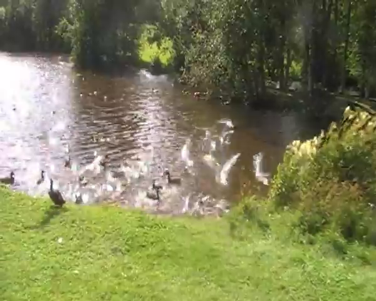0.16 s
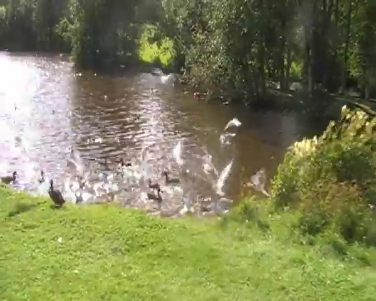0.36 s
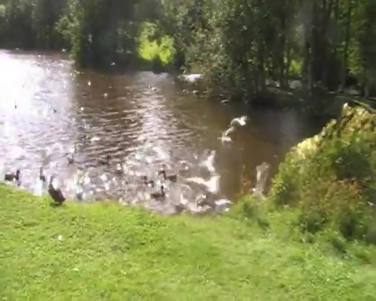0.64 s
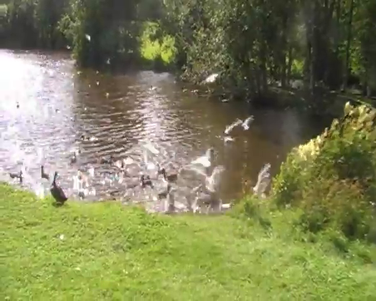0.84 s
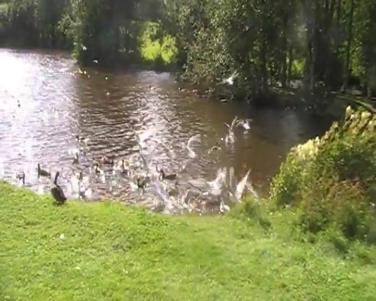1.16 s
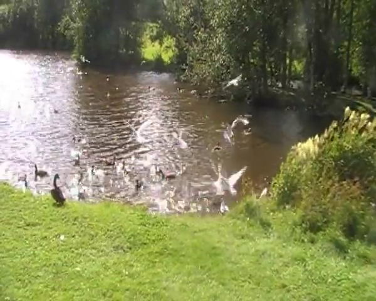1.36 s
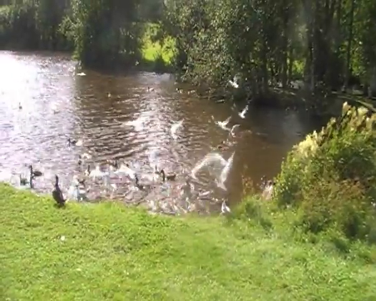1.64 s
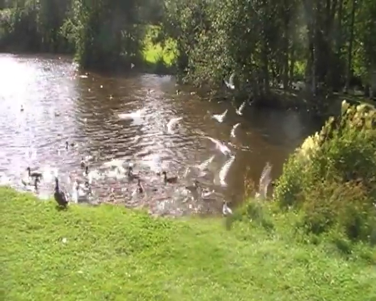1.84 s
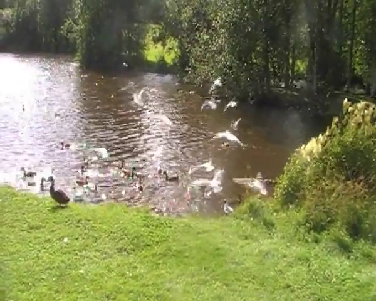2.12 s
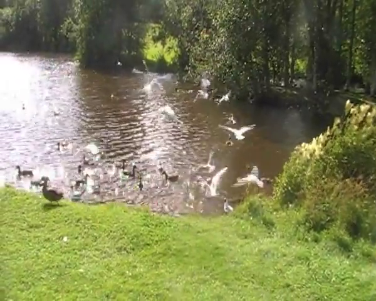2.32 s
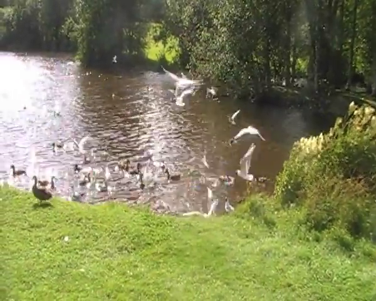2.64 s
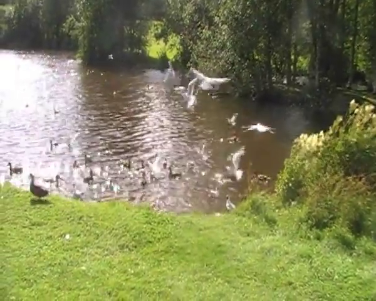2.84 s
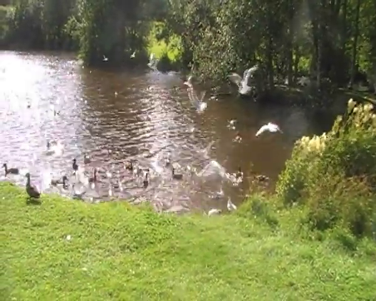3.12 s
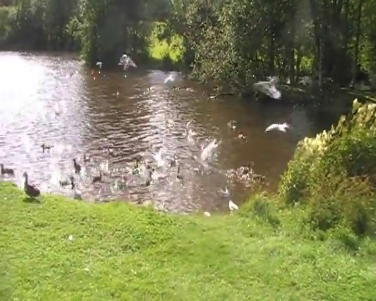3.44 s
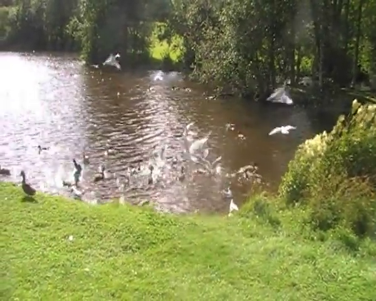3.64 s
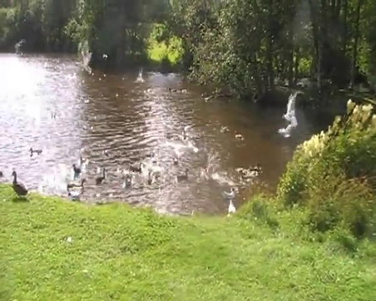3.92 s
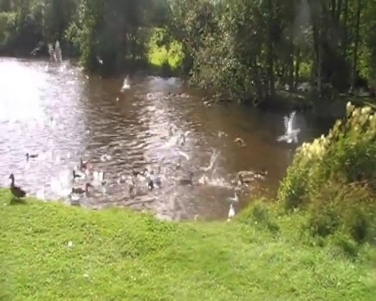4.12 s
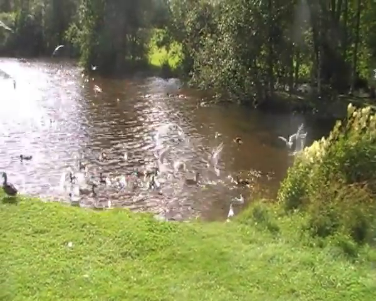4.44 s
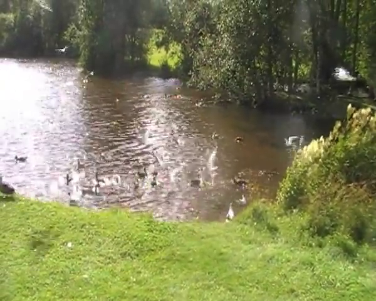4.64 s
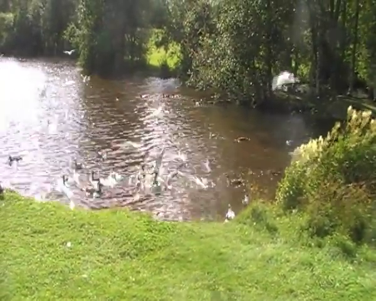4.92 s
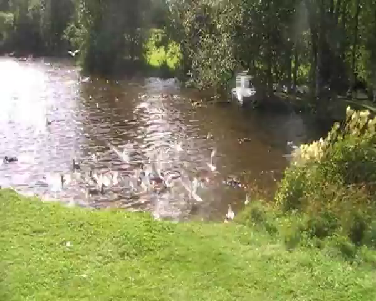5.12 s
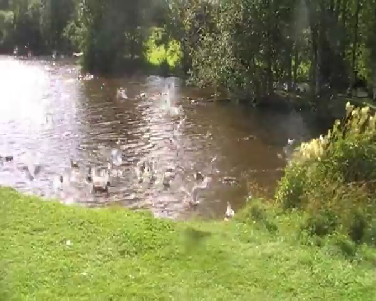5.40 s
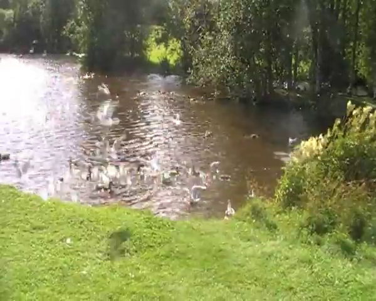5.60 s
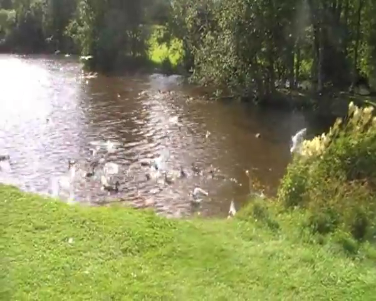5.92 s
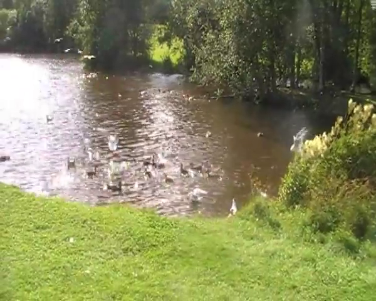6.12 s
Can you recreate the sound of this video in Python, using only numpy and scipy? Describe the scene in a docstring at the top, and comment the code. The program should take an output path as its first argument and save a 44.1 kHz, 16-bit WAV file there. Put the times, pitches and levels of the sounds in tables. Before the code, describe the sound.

Outdoor stereo sound of gulls over water, starting quiet with soft hiss while the water noise swells in. Hoarse rasps come about once a second, mostly leaning slightly right, with small croaks, a nasal grunt and faint far peeps. After the last rasp comes a bright, piercing kek with an open-air echo, then bright splashes and a brief trilled whistle arching high and falling. Paddling bubbles and low far rumble continue underneath.

```python
"""A grassy riverbank, gulls squabbling over food: long rasping cries, two sharp keks, a whistle that rises and falls.
The cries are rough syrinx pulses rung by throat and beak; keks, whistle and small notes are summed overtones.
Birds splash and paddle in shaped noise and rising bubble rings, and a low noise rumble hangs in the distance.
Bank and trees across the water answer the calls with decaying noise; the microphone adds a steady hiss."""
import sys
import numpy as np
from scipy import signal
from scipy.fft import rfft, irfft, next_fast_len
from scipy.io import wavfile
from scipy.ndimage import uniform_filter1d, map_coordinates

SR = 44100
rng = np.random.default_rng(int(sys.argv[2]) if len(sys.argv) > 2 else 0)


def waveform_to_disk(signal):
    """Save audio, clipped to [-1, 1], as 16-bit WAV at the path in sys.argv[1]."""
    frames = np.transpose(np.atleast_2d(signal))
    scaled = np.clip(frames, -1, 1) * 32767
    samples = np.round(scaled).astype(np.int16)
    wavfile.write(sys.argv[1], SR, samples)


N = 276066
TIME = np.arange(N) / SR

# Rasping cries before their pushes of effort:
# start_s, length_s, attack_s, level_db, pulse_hz, roughness_0_to_1, beak_hz, left_over_right_db
RASPS = [(0.554, .495, 0.095, -53.5, 409.3, 0.73, 1700, -2.5),
         (1.573, .5, 0.056, -47, 419.5, 0.77, 1726, -2.5), (2.98, .34, 0.024, -55, 487.2, 0.57, 1411, -3.5),
         (3.655, 0.4067, 0.034, -47, 450.5, .55, 1468, -6),
         (4.481, 0.31, 0.011, -55, 457.5, 0.7, 1406, -6.5)]
# Throat response, one list per cry: frequency_hz, gain_db
THROATS = [
    [(240, -36), (400, -25), (437, -14.5), (686, -11), (859, -1.5), (1040, -2), (1190, -1), (1820, -6.5),
     (2230, 0), (3120, -11), (3290, -8.5), (4120, -16), (4970, -10), (6230, -24), (8000, -28), (10400, -74),
     (17600, -120)],
    [(240, -51), (400, -25), (686, -34), (828, -7), (1060, -15.5), (1220, -9.5), (1800, -4.5),
     (2490, -11.5), (2740, -10.5), (3330, -27.5), (3590, -13.5), (4220, -23), (4670, -13), (5850, -31),
     (8000, -33), (10400, -41), (17600, -120)],
    [(350, -27), (600, 2), (735, -27), (899, -9), (1060, -13), (1160, -2.5), (1310, -2), (1450, 1),
     (2020, -16.5), (2330, 3), (3000, -18), (3270, -5), (3710, -34), (4500, -26), (5850, -53), (9900, -120)],
    [(240, -68), (400, -16), (583, -12), (723, -14), (784, -5.5), (897, -5.5), (986, -12.5), (1070, -2),
     (1210, -11.5), (1480, -4.5), (2010, -6), (2150, -8), (3270, -16), (4700, -17.5), (10000, -35),
     (13000, -60), (22000, -120)],
    [(410, -31), (700, -17), (903, -8.5), (1140, -18.5), (1400, 1.5), (1740, -12.5), (1940, -9),
     (2550, -11.5), (2790, -21), (3210, -11.5), (5000, -23), (6500, -47), (11000, -120)],
]
# Pushes and lulls of effort within the cries; pulse_hz is the target before effort raises it:
# peak_s, half_length_s, added_db, pulse_hz, roughness_0_to_1, beak_hz
PUSHES = [(0.685, 0.033, 3, 403, 0.67, 1750), (0.836, 0.025, 2.5, 406.8, 0.78, 1890),
          (.945, .026, 4.5, 390.6, 0.38, 2060), (1.014, .025, -1.5, 410.1, .64, 1450),
          (1.67, 0.011, 2.5, 418.5, 0.79, 1729), (1.863, .06, 1.5, 421.3, .74, 1960),
          (2.017, .025, 8.5, 422, .05, 2280), (3.03, .027, 5.5, 374.8, 0.48, 1380),
          (3.157, .02, -3, 486.6, 0.54, 1450), (3.205, 0.016, 5.5, 465, 0.52, 1660),
          (3.255, .018, 6, 456, .45, 1642), (3.752, .048, 6, 296, .2, 1970),
          (3.995, 0.024, 9, 410.6, 0.36, 2164), (4.502, .012, 4, 447.7, 0.61, 1393),
          (4.634, 0.024, -3.5, 453.7, 0.74, 1424), (4.731, 0.025, 6, 434.5, 0.74, 1906)]
# Single croaks around the cries, levels relative to each other: start_s, level_db, length_s
CROAKS = [(.531, -56, 0.012), (.568, -59, 0.013), (.61, -56, 0.011), (1.544, -45.5, 0.016),
          (1.576, -52.5, 0.011), (1.6, -49, 0.0079), (1.629, -71, .012), (1.658, -65, 0.012),
          (3.553, -46.5, 0.031), (3.585, -42, 0.036), (3.627, -50, 0.024), (3.683, -52, .012),
          (4.52, -47, 0.011), (4.568, -53, 0.0089), (4.84, -49.5, 0.036)]
# Strained tones breaking through the cries, levels relative to each other:
# start_s, length_s, middle_pitch_hz, glide_hz_per_s, level_db, roughness_0_to_1
STRAINS = [(.532, 0.052, 840, -600, -59.5, 0.2), (.635, 0.073, 860, -1200, -51, 0.28),
           (.72, 0.12, 818, -300, -60, 0.07), (1.585, 0.46, 846.4, -62, -55.5, 0.27),
           (3.71, 0.23, 877, -3, -53, 0.28), (3.012, 0.066, 1184, 302, -46.5, 0.16),
           (3.07, 0.034, 1501, 3, -50, 0.21), (3.138, 0.053, 1484, 0, -54, 0.09),
           (3.228, 0.049, 1440, -1100, -46.5, 0.33), (3.672, 0.033, 1371, 6000, -42, 0.31),
           (3.712, 0.055, 1522, -600, -40, 0.18), (3.785, .037, 1454, -300, -38.5, 0.22),
           (3.85, 0.067, 1346, -400, -42.5, 0.22)]
# Overtones of a strained tone: multiple, level_db
STRAIN_TONE = [(1, 8.5), (2, -7), (3, -8)]
# Keks, timed where the screech snaps clear: snap_s, pitch_hz, level_db, clear_note_length_s, glide_hz_per_s
KEKS = [(.718, 1673, -47.5, 0.052, 467), (4.945, 1672, -36.5, 0.042, 122)]
# Overtones of a kek: multiple, level_db
KEK_TONE = [(1, 1.5), (2, 6.5), (3, -4), (4, -3), (5, -19), (6, -18.5), (9, -34)]
# Course of the whistle before its trill, levels relative to each other: time_s, pitch_hz, level_db
WHISTLE_COURSE = [(5.728, 1530, -59), (5.746, 1688, -67), (5.764, 2082, -48), (5.804, 2684, -40.5),
                  (5.868, 3197, -45), (5.888, 3190, -39.5), (5.912, 2910, -50), (5.918, 2800, -35),
                  (5.926, 2144, -44), (5.94, 2150, -64)]
# Overtones of the whistle and the far peeps: multiple, level_db
WHISTLE_TONE = [(1, -0.5), (2, -14), (3, -26)]
# A nasal grunt in the flock: start_s, length_s, middle_pitch_hz, glide_hz_per_s, level_db, roughness_0_to_1
GRUNTS = [(1.435, 0.059, 462, -320, -54.5, 0.36)]
# Overtones of the grunt: multiple, level_db
GRUNT_TONE = [(2, -14), (3, 2), (4, -7), (5, -26), (6, -14), (8, -15)]
# Peeps from farther off: start_s, length_s, middle_pitch_hz, glide_hz_per_s, level_db, roughness_0_to_1
FAR_PEEPS = [(.765, 0.023, 4110, 6000, -59, .1), (2.878, .026, 2920, 6025, -63.5, .1),
             (5.44, 0.046, 2280, 5000, -66, .4), (5.49, .035, 2770, 0, -63, 0.17)]
# Birds hitting the water: start_s, level_db, length_s
SPLASHES = [(2.08, -62.5, 0.032), (2.17, -57.5, 0.055), (5.03, -62, .03), (5.207, -56.5, 0.018),
            (5.308, -55, 0.012), (5.6, -61, 0.071), (5.735, -50.5, 0.069), (5.885, -48.5, 0.056),
            (5.93, -52, 0.069), (6.05, -51.5, 0.075), (6.1, -49.5, 0.075), (6.24, -58, 0.038)]
# Spectrum of the splash spray: frequency_hz, gain_db
SPRAY = [(2500, -19), (4200, -13), (5700, -1), (7200, -6), (9000, -19.5), (15000, -31)]
# Spectrum of the lapping water: frequency_hz, gain_db
LAPPING = [(88, -34), (150, -6.5), (183, -12), (352, -7), (588, 1.5), (728, -3.5), (901, -1), (996, -5.5),
           (1930, -9.5), (2710, -20.5), (3000, -29), (3900, -22), (6600, -120)]
# Spectrum of the fizzing water: frequency_hz, gain_db
FIZZ = [(1290, -22), (2200, -2), (2700, -3.5), (3180, -3), (4090, -2.5), (4480, -0.5), (5400, 1),
        (6410, -2.5), (7370, -1.5), (8750, -7.5), (15500, -15)]
# Spectrum of the distant rumble: frequency_hz, gain_db
RUMBLE = [(15, -38), (25, -13), (40, -5.5), (50, 1), (60, 0), (72, -1), (90, -12), (122, -12), (175, -19.5),
          (260, -22), (500, -60.5)]
# Likeness of left and right in the surroundings: frequency_hz, likeness_0_to_1
ALIKE = [(60, 0.96), (150, 0.95), (380, 0.69), (950, 0.62), (2380, 0.55), (5980, 0.47), (15000, 0.64)]
# Decay of the trees' answer by 60 dB: frequency_hz, decay_s
TREES = [(300, 1.1), (1700, 2.13), (3300, 1.64), (6500, 0.78), (12000, 0.53)]

# A cry starts and ends this far below its body, and dies away over the release.
START_DB, END_DB, RELEASE_S = 5.5, 8, .06
PUSH_LOCK = 2.2  # how early in a push the syrinx settles on that push's rate and clarity
PITCH_RISE_PER_DB = 0.33  # share by which the pulse rate rises with effort
BEAK_WIDTH_HZ, BEAK_GAIN = 480, .6
PULSE_SCATTER_DB, FLAP_HZ, FLAP_DB = 2.6, 88, 10
# The screech before a kek's clear note, the change between them, the fade after and its last level.
SCREECH_S, SCREECH_ROUGH, SCREECH_DB = 0.046, 0.85, -14
SNAP_S, KEK_RELEASE_S, KEK_END_DB = 0.0116, 0.016, -6
# Shares of a kek's pitch: starts below, overshoots, is still sharp at the snap, sags in the fade.
KEK_SCOOP, KEK_OVERSHOOT, KEK_SETTLING, KEK_SAG = 0.0725, 0.0494, 0.015, 0.023
WHISTLE_ROUGH, WHISTLE_DB = 0.14, -0.5
# Shares of a short note's length, and how far its ends lie below its body.
NOTE_ATTACK, NOTE_RELEASE, NOTE_EDGE_DB = 0.12, 0.17, 16
# Swells of the surroundings, before each layer's trim: settled_db, lower_at_first_db, settling_s
RUMBLE_SWELL, LAPPING_SWELL, FIZZ_SWELL = (-61, 13.7, 3.6), (-62.5, 16.2, 3.06), (-59, 22.7, 3.2)
TOP_HZ = 15850  # upper limit of the microphone chain


def rasps():
    """Harsh cries: the syrinx rings each bird's throat, and the opening beak moves one resonance."""
    effort_db, pulse_hz, rough, beak_hz = effort()
    source = ground(syrinx(pulse_hz, rough))
    cries = np.zeros((2, N))
    for row, throat in zip(RASPS, THROATS):
        start, length, attack, level_db, _, _, _, side_db = row
        end = start + length
        fade_times = [start, start + attack, end - RELEASE_S, end]
        fade_db = np.interp(TIME, fade_times, [START_DB, 0, 0, END_DB])
        voice = coloured(source, throat)
        # a wider beak raises its resonance and lets more of it out
        beak = resonate(voice, beak_hz, BEAK_WIDTH_HZ)
        voice = voice + BEAK_GAIN * (beak_hz / 1700) ** 4 * beak
        cry = steady(voice) * during(start, end) * amp(level_db + effort_db - fade_db)
        cries += pan(cry, side_db)
    # the croaks come through a beak that is still half shut
    half_shut = resonate(coloured(source, THROATS[3]), np.full(N, 1330), 980)
    croaks = unit(half_shut) * bursts(CROAKS, rise=0.1)
    strains = notes(STRAINS, STRAIN_TONE, shake=0.225, shake_hz=596)
    return cries + pan(amp(-5.5) * (croaks + strains), side_db=-4)


def effort():
    """Each cry holds its own pulse rate, roughness and beak resonance; pushes of effort draw them to new values."""
    resting = []
    for start, length, _, _, rate, roughness, rest_hz, _ in RASPS:
        resting.append((start, rate, roughness, rest_hz))
        resting.append((start + length, rate, roughness, rest_hz))
    pulse_hz, rough, beak_hz = curves(resting)
    effort_db = np.zeros(N)
    for peak, half_length, added_db, push_hz, push_rough, push_beak in PUSHES:
        push = np.exp(-((TIME - peak) / half_length) ** 2)
        settled = np.minimum(PUSH_LOCK * push, 1)
        effort_db = effort_db + added_db * push
        pulse_hz = pulse_hz + settled * (push_hz - pulse_hz)
        rough = rough + settled * (push_rough - rough)
        beak_hz = beak_hz + push * (push_beak - beak_hz)
    pulse_hz = pulse_hz * (1 + PITCH_RISE_PER_DB * effort_db)
    return effort_db, pulse_hz, np.clip(rough, 0, 1), beak_hz


def syrinx(hz, rough, flap_scatter=.3, flutter_db=3.5, jitter=.21, air=.45):
    """Pulses that lock to a pitch when clear; when rough they scatter and come in uneven flaps."""
    cycles = np.cumsum(hz * (1 + .07 * rough * wobble(120))) / SR
    at = np.flatnonzero(np.diff(np.floor(cycles)))
    luck = rng.standard_normal((len(at), 2))
    shift = jitter * rough[at] * luck[:, 0] * SR / hz[at]
    moved = np.clip(at + shift, 0, N - 1).astype(int)
    strength = amp(PULSE_SCATTER_DB * rough[at] * luck[:, 1])
    pulses = unit(np.bincount(moved, strength, N))
    breath = unit(rng.standard_normal(N) * np.exp(-3 * (cycles % 1)))
    # each flap bursts open and dies away before the next
    flaps = np.cumsum(FLAP_HZ * np.exp(flap_scatter * wobble(90))) / SR % 1
    flap_db = rough * (flutter_db * wobble(210) - FLAP_DB * flaps)
    return steady((pulses + air * rough * breath) * amp(flap_db))


def ground(x, echo_db=-11, count=7):
    """A few quick bounces off water and bank smear the pulses and comb the spectrum."""
    lags = rng.uniform(.001, .014, count)
    signs = rng.choice([-1, 1], count)
    bounced = sum(sign * np.roll(x, int(lag * SR), axis=-1) for lag, sign in zip(lags, signs))
    return (x + amp(echo_db) * bounced) / np.sqrt(1 + count * amp(echo_db) ** 2)


def keks():
    """Two sharp calls that start as a screech and snap into a clear note; they reach the right ear first."""
    voice = sum(call(kek_course(*row), KEK_TONE, shake=0.201, shake_hz=2197, flutter_db=3.0) for row in KEKS)
    return pan(np.array([np.roll(voice, 1), voice]), side_db=1.0)


def kek_course(snap, hz, db, hold, glide, break_db=-4, break_rough=0.73, clear_rough=0.24, held_rough=0.037):
    """Time, pitch, level and roughness of a kek: it scoops up, overshoots, snaps clear, holds and fades."""
    last_hz = hz + glide * hold
    return [(snap - SCREECH_S, hz * (1 - KEK_SCOOP), db + SCREECH_DB, SCREECH_ROUGH),
            (snap - SNAP_S, hz * (1 + KEK_OVERSHOOT), db + break_db, break_rough),
            (snap, hz * (1 + KEK_SETTLING), db, clear_rough),
            (snap + SNAP_S, hz, db, held_rough),
            (snap + hold, last_hz, db, held_rough),
            (snap + hold + KEK_RELEASE_S, last_hz * (1 - KEK_SAG), db + KEK_END_DB, clear_rough)]


def whistle(left_s=0.011, right_s=.022, bounce_db=-5):
    """A trilled whistle from a flying bird, crossed on each side by its own reflection off water and bank."""
    swing = np.sin(2 * np.pi * 56 * TIME)  # the trill, 56 swings a second
    course = [(s, hz, db + WHISTLE_DB, WHISTLE_ROUGH) for s, hz, db in WHISTLE_COURSE]
    voice = call(course, WHISTLE_TONE, trill=.05 * swing) * amp(2.5 * swing)
    bounce = np.array([np.interp(TIME - lag, TIME, voice) for lag in (left_s, right_s)])
    direct = np.array([np.roll(voice, 1), voice])
    return pan(direct, side_db=-3.0) + amp(bounce_db) * bounce


def small_calls():
    """A short nasal grunt in the flock and thin peeps from farther off."""
    return pan(notes(GRUNTS, GRUNT_TONE) + notes(FAR_PEEPS, WHISTLE_TONE), side_db=-3.0)


def notes(rows, tone, **voice):
    """Short notes that rise, hold and fade while their pitch glides."""
    shares = [0, NOTE_ATTACK, 1 - NOTE_RELEASE, 1]
    edges_db = [NOTE_EDGE_DB, 0, 0, NOTE_EDGE_DB]
    out = np.zeros(N)
    for start, length, hz, glide, db, rough in rows:
        course = [(start + share * length, hz + glide * (share - .5) * length, db - edge_db, rough)
                  for share, edge_db in zip(shares, edges_db)]
        out += call(course, tone, **voice)
    return out


def call(course, tone, shake=0.17, shake_hz=1500, trill=0, flutter_db=5):
    """A pitched call; roughness shakes its pitch and level until the overtones smear into a screech."""
    hz, db, rough = curves(course)
    gate = during(course[0][0], course[-1][0])
    hz = hz * (1 + shake * rough * wobble(shake_hz) + trill)
    on = gate > 0
    phase = 2 * np.pi * np.cumsum(hz[on]) / SR
    voice = np.zeros(N)
    voice[on] = unit(sum(amp(level) * np.sin(multiple * phase) for multiple, level in tone))
    return voice * gate * amp(db + flutter_db * rough * wobble(350))


def splashes():
    """Birds hit the water: short bursts of bright spray, a little to the left."""
    return pan(bursts(SPLASHES, rise=0.11) * droplets(SPRAY, grain_db=2, grain_hz=704), side_db=3.0)


def lapping():
    """Water laps under the flock, shaped noise with the bubbles of paddling feet below it."""
    level_db = swell(*LAPPING_SWELL)
    water = droplets(LAPPING, grain_db=1.0, grain_hz=59.4)
    return amp(level_db + 2) * water + amp(level_db - 6.5) * bubbles()


def bubbles(count=240, centre_hz=680, life_cycles=11):
    """Paddling feet leave bubbles, each a short rising ring."""
    when, pitch, size = rng.random(count), rng.standard_normal(count), rng.exponential(size=count)
    t = np.arange(SR // 20) / SR
    cycles = centre_hz * np.exp(.22 * pitch)[:, None] * t
    rising = np.sin(2 * np.pi * cycles * (1 + 0.0074 * cycles))
    ring = rising * amp(-25 * cycles / life_cycles) * (1 - np.exp(-cycles))
    loudness = amp(2.5 * np.minimum(size, 2))[:, None]
    where = (when * N).astype(int)[:, None] + np.arange(len(t))
    return unit(np.bincount(where.ravel(), (ring * loudness).ravel(), N)[:N])


def fizz():
    """Fizzing water: bright noise in fine clumps whose level wavers."""
    level_db = swell(*FIZZ_SWELL) + 0.18 + 1.02 * wobble(14)
    return amp(level_db) * droplets(FIZZ, grain_db=0.5, grain_hz=282.4)


def rumble():
    """A far low rumble: bass noise that swells and then holds."""
    return amp(swell(*RUMBLE_SWELL)) * droplets(RUMBLE, grain_db=2.0, grain_hz=10)


def droplets(spectrum, grain_db, grain_hz):
    """Stereo noise of rms 1 that comes in small clumps."""
    sides = []
    for _ in range(2):
        clumps = rng.standard_normal(N) * amp(grain_db * wobble(grain_hz))
        sides.append(coloured(clumps, spectrum))
    return spread(*sides)


def scatter(x, t60, late):
    """Diffuse stereo answer of energy 1 that builds up over late seconds and decays by pitch."""
    hz, t, z = signal.stft(rng.standard_normal((2, SR)), SR, nperseg=256)
    decay = amp(-60 * t / along(t60, hz)[:, None])
    tail = signal.istft(z * decay * (1 - np.exp(-t / late)), SR, nperseg=256)[1]
    return signal.fftconvolve(x, tail / np.linalg.norm(tail[0]), axes=1)[:, :N]


def amp(db):
    """Decibels to gain."""
    return 10 ** (np.asarray(db) / 20)


def unit(x):
    """Scale to rms 1."""
    return x / np.sqrt(np.mean(x ** 2) + 1e-20)


def steady(x):
    """Even out slow swells to rms 1 and keep the fast grain."""
    return x / np.sqrt(np.abs(uniform_filter1d(x ** 2, size=1200)) + 1e-12)


def along(points, hz):
    """Values at hz from (frequency, value) points on a log axis."""
    f, v = np.transpose(points)
    return np.interp(np.log(hz + 1), np.log(f + 1), v)


def curves(rows):
    """One value per sample for each column after the time."""
    times, *columns = np.transpose(rows)
    return [np.interp(TIME, times, column) for column in columns]


def during(start, end):
    """A soft gate between two times."""
    return uniform_filter1d(1. * ((TIME > start) & (TIME < end)), size=256)


def bursts(rows, rise):
    """Envelope of short bursts that swell over a share of their length and die away."""
    out = np.zeros(N)
    for start, db, length in rows:
        times = start + length * np.array([0, rise, 2 / 3, 1, 2])
        out += amp(db) * np.interp(TIME, times, [0, 0.96, 0.97, 0.3, 0.0])
    return out


def swell(settled_db, lower_db, settle_s):
    """A level in dB that climbs ever more slowly, then holds."""
    return settled_db - lower_db * np.clip(1 - TIME / settle_s, 0, 1) ** 2


def wobble(rate):
    """A smooth random curve, rate knots a second."""
    knots = rng.standard_normal(N // 4)
    return map_coordinates(knots[:int(N * rate / SR) + 4], [TIME * rate], order=2)


def coloured(x, spectrum):
    """Causal minimum-phase filter with the gain of (frequency, dB) points."""
    size = 4096
    gain = amp(along(spectrum, np.fft.rfftfreq(size, 1 / SR)))
    cepstrum = irfft(np.log(gain + 1e-6))
    # folding the cepstrum onto positive time makes the response causal
    fold = 1 + np.sign(size / 2 - np.arange(size))
    fold[0] = 1
    response = irfft(np.exp(rfft(cepstrum * fold)))
    return signal.oaconvolve(x, response)[:N]


def resonate(x, hz, width_hz):
    """One resonance whose centre follows a curve: shift down, smooth, shift back up."""
    turn = np.exp(2j * np.pi * np.cumsum(hz) / SR)
    keep = np.exp(-np.pi * width_hz / SR)
    return 2 * np.real(turn * signal.lfilter([1 - keep], [1, -keep], x / turn))


def pan(x, side_db):
    """Place a sound between left and right; positive leans left."""
    return x * amp([[side_db / 2], [-side_db / 2]])


def spread(a, b):
    """Two unrelated sounds become a stereo pair of rms 1, nearly mono in the bass."""
    m = next_fast_len(N)
    likeness = np.clip(along(ALIKE, np.fft.rfftfreq(m, 1 / SR)), 0, 1)
    turn = np.arccos(likeness) / 2
    mid, side = irfft(rfft([a, b], m) * [np.cos(turn), np.sin(turn)], m)[:, :N]
    return unit(np.array([mid + side, mid - side]))


def scene():
    """The calls, their quick scatter off bank and water, the trees' long answer, and the river."""
    harsh, sharp, whistled = rasps() + small_calls(), keks(), whistle()
    to_bank = amp(-24.0) * harsh + amp(-3) * sharp + amp(-10) * whistled
    bank = scatter(to_bank, [(1000, 0.13), (8000, 0.24)], late=0.009)
    to_trees = amp(-21.0) * harsh + amp(-16.0) * sharp + amp(-16.5) * whistled
    trees = scatter(to_trees, TREES, late=0.01)
    trees = trees + 0.43 * trees[::-1]  # the far bank lies ahead, so both ears hear much the same
    river = splashes() + lapping() + fizz() + rumble()
    return harsh + sharp + whistled + bank + trees + river


def record(dry, hiss_db=-67, start_s=0.036):
    """The sound begins after a short silence and fades in over 4 ms; a partly shared stereo hiss is added and
    nothing above TOP_HZ passes."""
    hiss = rng.standard_normal(N) + 0.58 * rng.standard_normal((2, N))
    opening = np.clip((TIME - start_s) / 0.004, 0, 1)
    sound = (dry + amp(hiss_db) * unit(hiss)) * opening
    m = next_fast_len(N + 8192)
    return irfft(rfft(sound, m) * (np.fft.rfftfreq(m, 1 / SR) < TOP_HZ), m)[:, :N]


dry = scene()
out = record(dry)
waveform_to_disk(out)
```